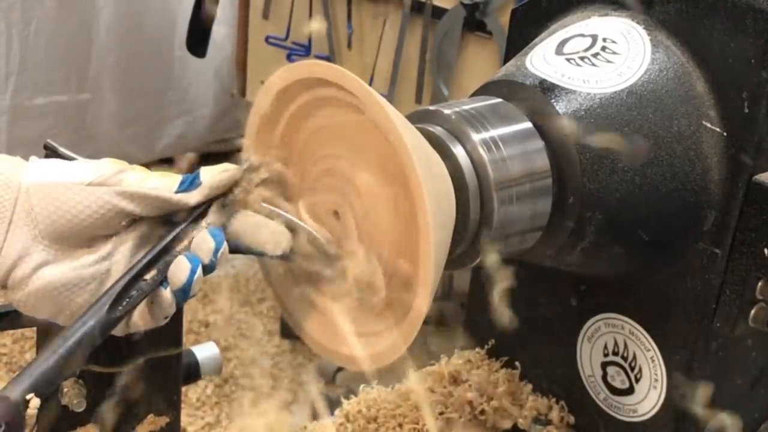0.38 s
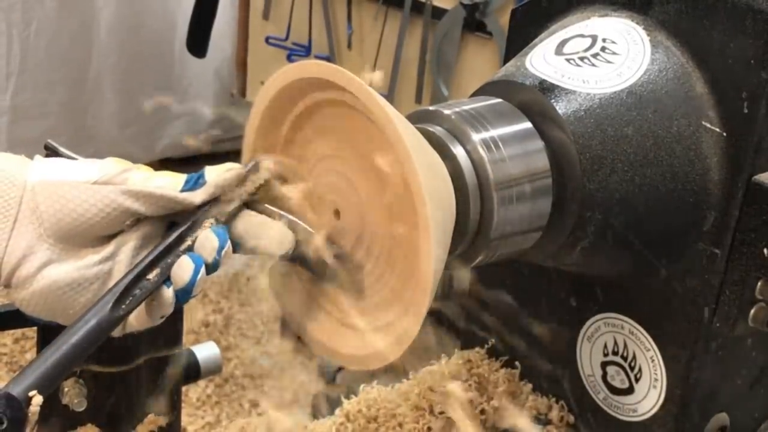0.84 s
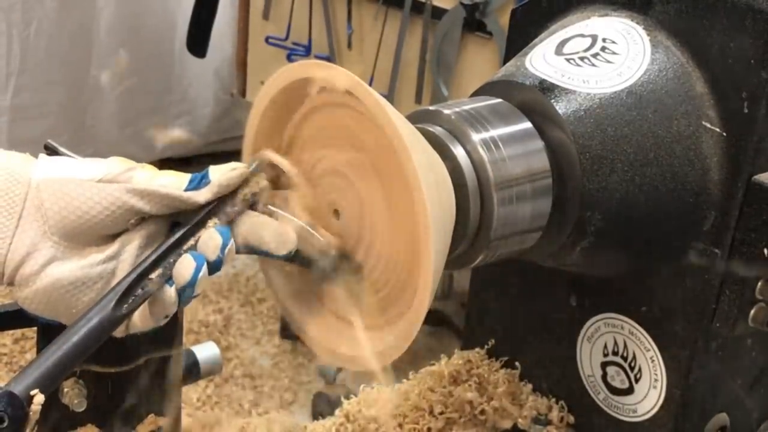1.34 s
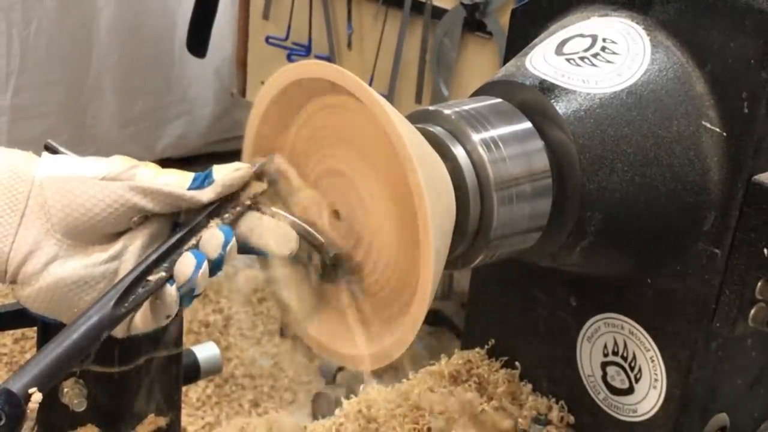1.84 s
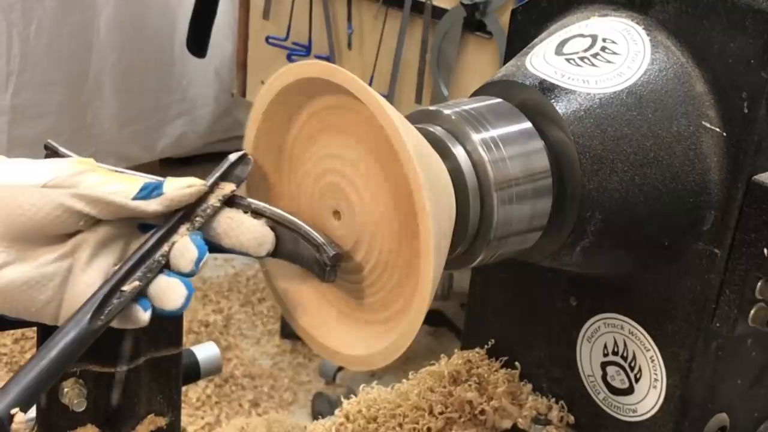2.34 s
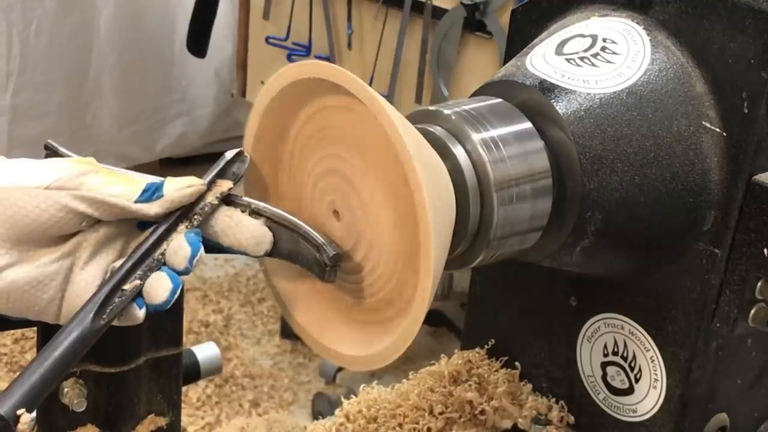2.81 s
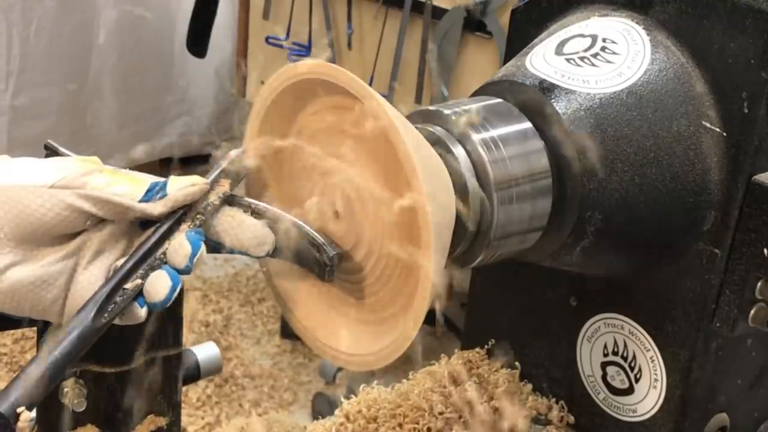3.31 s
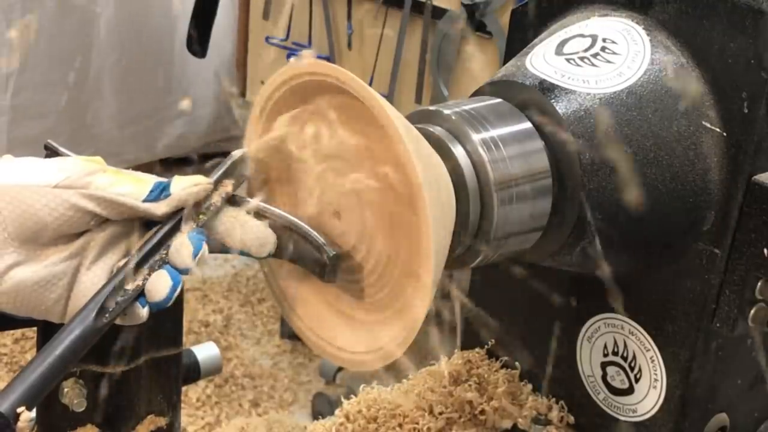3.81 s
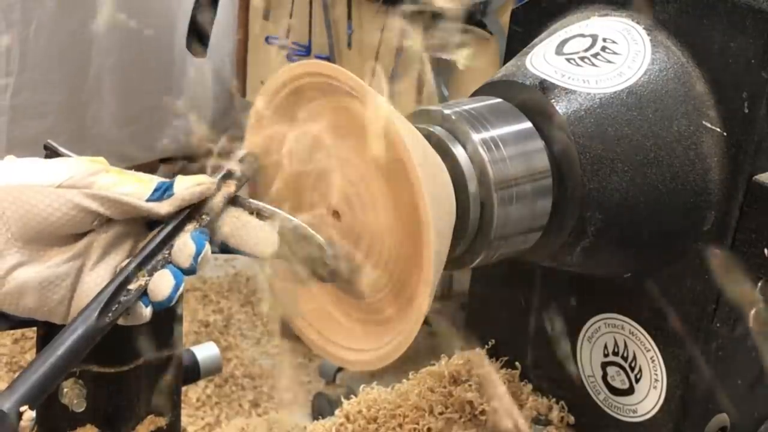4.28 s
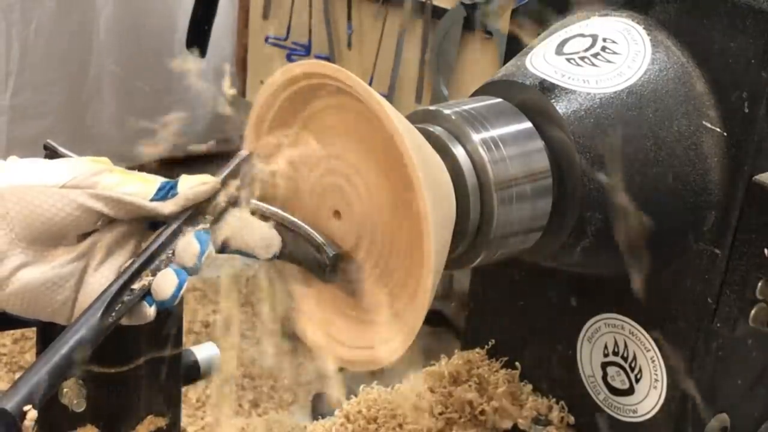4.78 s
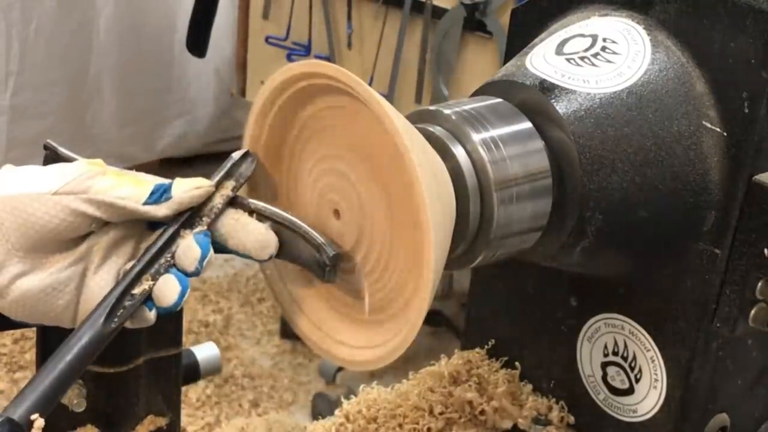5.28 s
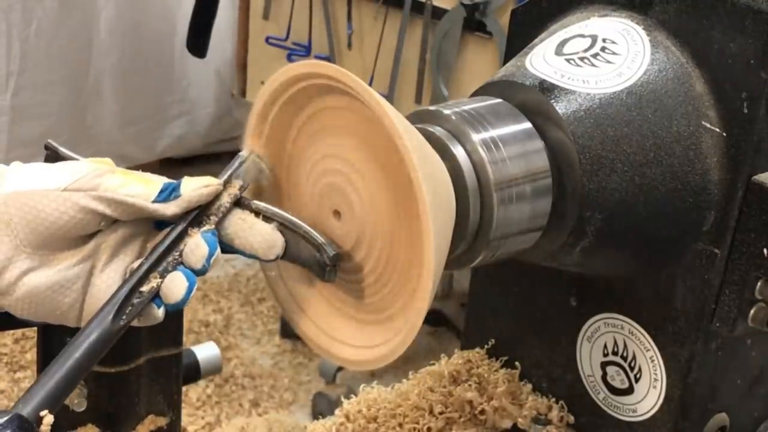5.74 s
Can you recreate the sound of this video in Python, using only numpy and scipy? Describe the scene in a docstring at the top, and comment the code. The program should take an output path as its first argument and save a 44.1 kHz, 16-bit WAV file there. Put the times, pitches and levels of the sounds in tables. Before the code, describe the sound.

Close woodturning: harsh, rapidly pulsing scraping and ringing as a gouge hollows a bowl, broken by two short pauses with faint falling chips.

```python
"""A gouge hollows a wooden bowl on a lathe in a small workshop, heard close up while the motor hums and its drive whines.
The first pass is already running: nearly the same ridges come round each turn and end grain comes twice a turn.
They ring gouge, bowl and rest, rough spots chatter and filtered noise hisses as shavings part. After about two seconds
the edge lifts and a few chips land. The second pass starts with small catches; in the next pause chips land again,
then a third pass runs to the end."""
import sys
import numpy as np
from scipy import signal
from scipy.fft import rfft, irfft, next_fast_len
from scipy.io import wavfile
from scipy.ndimage import uniform_filter1d, map_coordinates

SR = 44100
rng = np.random.default_rng(int(sys.argv[2]) if len(sys.argv) > 2 else 0)


def dump_mix(stems):
    """Bounce the given channels to the path in sys.argv[1] as a 16-bit WAV at rate SR."""
    frames = np.atleast_2d(stems).T  # one column per channel
    limited = np.clip(frames, -1, 1)  # hard clip at full scale
    pcm = np.round(limited * 32767).astype(np.int16)
    wavfile.write(sys.argv[1], SR, pcm)


def convert_level_to_amplitude(level_db):
    """Map a level in decibels to its linear amplitude factor."""
    exponent = np.asarray(level_db, float) / 20
    return 10 ** exponent


N = 259308
TIME = np.arange(N) / SR
TURNS_PER_S = 18.45
SPINDLE = TURNS_PER_S * TIME  # turns of the lathe so far


def level(x, db):
    """Scale to an rms level."""
    return x * convert_level_to_amplitude(db) / np.sqrt(np.mean(x ** 2))


def colour(x, points):
    """Filter by (f/Hz, level/dB) points, to rms 1."""
    hz, db = np.transpose(points)
    size = next_fast_len(N)
    axis = np.log(np.arange(size // 2 + 1) * SR / size + 1)
    curve_db = np.interp(axis, np.log(hz), db)
    return level(irfft(rfft(x, size) * convert_level_to_amplitude(curve_db), size)[:N], 0)


def ring(x, hz, width_hz):
    """One resonance, gain 1 at its centre."""
    return signal.lfilter(*signal.iirpeak(hz, hz / width_hz, fs=SR), x)


def walk(rate, size=N):
    """Smooth chance that changes about rate times a second, spread 1."""
    k = int(SR / rate)
    return level(uniform_filter1d(uniform_filter1d(rng.standard_normal(size), k), k), 0)


def drift(rate, time):
    """Slow chance: random points rate times a second, joined by lines."""
    points = rng.standard_normal(400)
    return np.interp(time * rate, np.arange(len(points)), points)


def swell(time, start, end):
    """Rises soon after start, dies away near end."""
    return np.abs(np.sin(np.pi * np.clip((time - start) / (end - start), 0, 1))) ** .4


def snaps(rate, decay_s):
    """Fibres parting: sudden rises that fade, mean 0 and spread 1."""
    kicks = (rng.random(N) < rate / SR) * rng.random(N)
    fading = signal.lfilter([1], [1, -np.exp(-1 / (decay_s * SR))], kicks)
    return level(fading - fading.mean(), 0)


def ticks(rows, decay_s, width):
    """Each (t/s, peak level/dB, f/Hz) row is a tick with a short dry rattle; width is a share of f."""
    out, t = np.zeros(N), np.arange(600) / SR
    for (s, db, hz), noise in zip(rows, rng.standard_normal((len(rows), len(t)))):
        tick = ring(ring(noise * np.exp(-t / decay_s), hz, width * hz), hz, width * hz)
        i = int(s * SR)
        out[i:i + len(t)] += convert_level_to_amplitude(db) * tick / np.abs(tick).max()
    return out


def shop_noise():
    """The steady noise of the workshop: coloured chance whose level wavers slightly."""
    # colour of the workshop noise: [f/Hz, level per Hz/dB, shape only]
    shop = [(15, -66), (25, -33), (179, -2.5), (248, -17), (486, -7.5), (654, -13), (800, -10.5),
            (2090, -12), (2460, -16.5), (2800, -18), (3100, -16), (3500, -24.5), (5500, -22.5),
            (8500, -23.5), (9500, -16.5), (10100, -17.5), (11000, -21), (12100, -27), (16500, -28)]
    return level(convert_level_to_amplitude(0.14 * walk(26)) * colour(rng.standard_normal(N), shop), -69)


def tones(lines, waver_db):
    """Steady (f/Hz, level/dB) tones whose loudness wavers a little."""
    out = 0
    for hz, db in lines:
        gain = np.sqrt(2) * convert_level_to_amplitude(db + waver_db * drift(15.0, TIME))
        out = out + gain * np.sin(2 * np.pi * (hz * TIME + rng.random()))
    return out


def motor_hum():
    """The running motor hums on a few fixed tones."""
    # tones of the motor: [f/Hz, rms level before wavering/dB]
    motor = [(199.2, -81.5), (349.9, -86), (602.9, -83.5), (775.2, -80.5), (802.1, -82), (1114, -87),
             (1475, -83), (1545, -101), (2078, -86)]
    return tones(motor, 2.1)


def drive_whine():
    """The drive switches fast; the motor current puts side tones around its switching tone."""
    # tones around the switching tone: [distance/multiples of the current's f, rms level before wavering/dB]
    drive = [(-9, -89.9), (-5.5, -90.8), (-3, -81.4), (-1, -82.5), (0, -86.6), (1, -80.6), (3, -79.1),
             (5, -85.9), (6, -88.8), (11, -85.7), (13, -85.4), (15, -77.3)]
    switch_hz, current_hz = 10000, 44.48
    return tones([(switch_hz + k * current_hz, db) for k, db in drive], 0.98)


def contact_db():
    """The edge bites at once, lifts ever faster and grazes a moment longer; silent between passes."""
    # the passes: [edge touches t/s, lift begins t/s]
    touches = [(-1, 1.92), (2.9, 4.83), (5.474, 6)]
    # each lift: [fall in its first tenth of a second/dB, level of the graze that lingers/dB]
    lifts = [(21, -23), (26, -45), (26, -45)]
    touch_s, touch_db = .016, -24
    graze_db_per_s, graze_s = 90, .2
    gain = 0
    for (touch, lift), (fall_db, graze_db) in zip(touches, lifts):
        after = np.maximum(TIME - lift, 0)
        bite = convert_level_to_amplitude(touch_db * np.clip(1 - (TIME - touch) / touch_s, 0, 1)) * (TIME > touch)
        graze = convert_level_to_amplitude(graze_db - graze_db_per_s * after) * np.clip(1 - after / graze_s, 0, 1)
        gain = gain + bite * np.maximum(convert_level_to_amplitude(-fall_db * (10 * after) ** 1.5), graze)
    return 20 * np.log10(gain + 1e-9)


def passes(*names, follows=0.83):
    """The hand's pressure as a gain, named columns added; follows < 1 lets a heavy part outlast the lift."""
    # how the hand leans: [t/s, cutting gain/dB, shaving hiss gain over cutting/dB, bowl rumble gain/dB]
    hand = [(0, -39, -1, -53.5), (.55, -41, 2.5, -49), (1, -42, 2.5, -51.5), (1.45, -42, 0.5, -52),
            (1.92, -42, -3, -54.5), (2.92, -50, 2.5, -69), (2.98, -48.5, 4, -66), (3.15, -42, 1.5, -52),
            (3.45, -42, 5, -50.5), (3.801, -40.5, 3.5, -55), (4.1, -39.5, 2.5, -56), (4.351, -39, 0, -56.5),
            (4.65, -36.5, -2, -56), (4.83, -38, -1.5, -56.5), (5.49, -44, -11.5, -76), (5.6, -40, -10, -79),
            (5.76, -40.5, -7.5, -62), (5.88, -38.5, -8, -59)]
    s, *columns = np.transpose(hand)
    by_name = dict(zip(("cut", "hiss", "rumble"), columns))
    contact = contact_db()
    lean_db = np.interp(TIME, s, sum(by_name[name] for name in names))
    return convert_level_to_amplitude(lean_db + follows * contact) * (contact > -60)


def surface(turns, keep, rate):
    """Chance wound round the bowl: each turn keeps most of what the last one left."""
    cells, count = 2400, int(turns.max()) + 30  # cells in a turn, number of turns
    fresh = walk(rate, size=cells * count).reshape(count, cells)
    wound = signal.lfilter([np.sqrt(1 - keep ** 2)], [1, -keep], fresh, axis=0).ravel()
    return map_coordinates(wound, [(turns + 25) * cells], order=3)


def spot(turns, at):
    """A bump once a turn."""
    width_turns = 0.068
    return np.exp(-.5 * (((turns - at + .5) % 1 - .5) / width_turns) ** 2)


def wood():
    """The turning wood: where the edge is, how grain and torn spots swell the cut, how much repeats."""
    # the grain as the edge meets it, strengths before later scaling: [t/s, lead of the edge/turns,
    # end grain throb/dB, bowl out of true/dB, first torn spot/dB, second torn spot/dB, share that repeats/0-1]
    grain = [(0, -0.00064, 2.5, -1.3, 5.5, -4, 0.9), (0.899, -0.017, 1.5, 1, 1, 0, 0.86),
             (1.953, -0.12, 2.5, 0, -2.5, 1, 0), (2.949, 0.063, 3.5, 8, -19.5, 7, 0.44),
             (3.3, 0.11, 3, -2.5, 4, 1.5, 1), (3.9, 0.12, 3.5, 0.5, -7.5, 0.5, 0.95),
             (4.501, .17, 3.5, 0.5, 4.5, 7, 0.5), (4.899, 0.18, 1.5, -2.5, 11.5, -11, 0.8),
             (5.474, 0.24, 7, -8, 4, 7, 0.3), (5.51, 0.21, 7.5, -2.5, 14, 9, 0.2),
             (5.571, 0.24, 8, 0.5, 12, 2, 0.4), (5.648, 0.25, 5, 0, 16, 9, 0.2),
             (5.88, 0.29, 0, -3, 9, -6, 0.46)]
    s, *columns = np.transpose(grain)
    lead, throb_db, true_db, first_db, second_db, repeat = (np.interp(TIME, s, c) for c in columns)
    turns = SPINDLE + lead
    half = 4 * np.pi * turns
    # end grain bites fast and lets go slowly
    throb = throb_db * (np.cos(half) + .3 * np.cos(2 * half + 1.1))
    grain_db = throb + true_db * np.cos(half / 2)
    torn_db = first_db * spot(turns, 0.07) + second_db * spot(turns, 0.63)
    hard_db = 1.7 * surface(turns, .99, 300)  # harder and softer growth rings
    return turns, grain_db, torn_db, hard_db, repeat


def modes_ringing(ridges, fibres, bite, torn_db, repeat):
    """Repeating ridges and fresh fibres ring the modes of gouge and bowl, more or less by where the edge touches."""
    # modes of gouge and bowl: [f/Hz, width/Hz, then relative level/dB at each of five places]
    modes = [(137, 14, -17.5, -10.5, -8, -44, -22), (249, 19, -35, -9, 1, -35, -25),
             (497, 8.7, -29, -11, -1, -9, -35), (584, 9.5, 0.5, 4, 7.5, -5.5, -8),
             (701, 35, -22, -4.5, -10, -15, -22), (844, 16, -11, 0, 1, -31, -26),
             (1093, 32, -9, -1.5, -3.5, -8.5, -17), (1405, 18, 0.5, 2, 8, -2, 1),
             (1650, 137, -8, 2, -5.5, -5, -2.5), (1972, 80, 6, 6.5, -19, -3, -1),
             (2074.5, 33, 0, 5.5, 15.5, 3, 9), (2224, 27.5, 7.5, 6.5, 13, 4, 2),
             (2350, 120, -4, -0.5, 6.5, 5.5, 10), (2494, 172, 2.5, 1, 11, 5.5, 10),
             (2803, 224, 0, -0.5, 6.5, -2, 2), (3105, 67, -5, -2, 11.5, 3, -2),
             (3475, 60, -5, -13, 11.5, -6, 3.5), (3675, 53, -3, -13, 9.5, 1.5, 4),
             (3850, 110, 2.5, -36, -12, 2.5, -3), (4178, 37, 7.5, 2, 6, 3, -1), (4390, 68, 5, 3, 5, 1, 1),
             (4746, 42, 6, 3.5, -18, 2, 1), (5156, 92, 2, -0.5, -20, -5, -4), (5510, 105, 1, -8, 8, -1, -8),
             (6110, 95, -3, -14, -21, -8, -7), (6710, 130, -4, -3, 4, -1.5, -7),
             (7150, 130, 0, -39, -4, -5, -1.5), (7600, 49, -9, -6, -37, -10, -30),
             (8370, 180, -0.5, -11, -21, -2.5, -7), (9190, 79, -1, -4, 10, -2, -2),
             (12500, 210, -6, -3, 4, -8, -15)]
    # where the edge touches: [t/s, place/0-4]
    touched = [(.3, 0), (1.6, 1), (2.5, 1), (2.6, 2), (3.6, 2), (4.5, 3), (5.2, 3), (5.3, 4)]
    low_repeat = .45  # slow low modes blur the ridges: part of the repeating share they feel
    crackle_per_s, crackle_db = 45, -2.5  # splinters pinging each bright mode; bite sets how many
    place = np.interp(TIME, *np.transpose(touched))
    body, power = 0, 0
    for k, (hz, width_hz, *db) in enumerate(modes):
        share = np.clip(repeat, 0, 1) / (1 + (hz / 4600) ** 4)  # fine ridges do not survive a turn
        share = share * (low_repeat if hz < 1800 else 1)
        force = np.sqrt(share) * ridges + np.sqrt(1 - share) * fibres
        if hz < 1800:  # the heavy low modes barely feel the torn spots
            force = force * convert_level_to_amplitude(-.7 * torn_db)
        if hz > 2700:
            splinters = rng.random(N) < crackle_per_s / SR * bite ** 2
            force = force + convert_level_to_amplitude(crackle_db) * np.sqrt(SR / crackle_per_s) * splinters
        gain = convert_level_to_amplitude(np.interp(place, np.arange(len(db)), db))
        body = body + (-1) ** k * gain * ring(force, hz, width_hz)
        power = power + gain ** 2 * width_hz * np.pi / SR * (hz < 4600)
    return convert_level_to_amplitude(-4.0) * body / np.sqrt(power)


def chatter(turns):
    """Rough spots: bursts of a few modes and a dry scrape at the same angle every turn, each a little different."""
    # rough spots: [from t/s, to t/s, angle/turns, list of modes (f/Hz, level over cutting/dB)]
    rough = [(-.4, .9, .655, [(2235, 7)]), (.25, .75, .095, [(2820, .5)]), (-.3, .9, .97, [(1985, 1),
             (3950, -2)]), (-.3, .6, .075, [(2570, -1), (3110, -3)]), (.3, 1.25, .58, [(2080, 1)]),
             (.2, 1.8, .47, [(2780, 1)]), (-.4, 1, .5, [(6650, -4), (7660, -6)]),
             (.8, 1.55, .66, [(1985, 1), (4480, -3)]), (.8, 2, .025, [(6550, -2), (7580, -7)]),
             (.9, 1.95, .085, [(1700, 2)]), (.9, 1.95, .18, [(2000, 1)]), (1.3, 1.95, .44, [(2590, -1),
             (6370, -6)]), (2.93, 3.2, .63, [(1655, -4), (2080, -1), (2420, -1), (3020, -1)]),
             (2.8, 4.4, .93, [(2100, 1.5)]), (2.95, 3.6, .96, [(3380, 2), (4330, -2)]),
             (2.9, 3.55, .005, [(4130, -2), (5720, -3), (7660, -2)]), (2.9, 4.4, .99, [(6550, -3)]),
             (2.85, 4.85, .07, [(2075, 3.5)]), (2.95, 4.4, .445, [(2470, -1)]), (3.1, 4, .44, [(5450, -6),
             (6970, -4)]), (3.45, 4.5, .46, [(3400, 6.5)]), (4.35, 4.92, .45, [(3550, 1)]),
             (3.8, 4.4, .41, [(3790, 0)]), (3.5, 4.7, .61, [(2430, 4.5)]), (3.2, 4.97, .125, [(2570, 2)]),
             (3.4, 4.9, .045, [(4050, -2)]), (3.85, 4.5, .15, [(2460, 1), (3110, 1)]),
             (4.25, 5.1, .15, [(2470, 4), (3110, 3.5), (3660, 0)]), (5.4, 6.1, .08, [(2500, 4.5), (3090, 5),
             (3700, 0)]), (5.4, 5.74, .985, [(2780, 2), (3960, -2), (5380, -2)]),
             (5.3, 6.1, .585, [(2400, 1)]), (5.5, 5.74, .48, [(4150, -1), (5380, -7)])]
    rise_s, fall_s = .0024, .0032
    scrape_hz, scrape_width_hz = 3570, 3300
    out = np.zeros(N)
    scrape = ring(rng.standard_normal(N), scrape_hz, scrape_width_hz)
    scrape = level(ring(scrape, scrape_hz, scrape_width_hz), -8.5)
    for start, end, at, modes in rough:
        now = slice(max(int(start * SR), 0), int(end * SR))
        since = ((turns[now] - at + .5) % 1 - .5) / TURNS_PER_S
        burst = np.exp(-.5 * (since / np.where(since < 0, rise_s, fall_s)) ** 2)
        uneven = convert_level_to_amplitude(1.3 * drift(18, TIME[now])) * swell(TIME[now], start, end)
        rung = 0
        for hz, db in modes:
            wobble = 1.1 * drift(60, TIME[now])
            rung = rung + convert_level_to_amplitude(db) * np.sin(2 * np.pi * hz * since + wobble)
        out[now] += uneven * burst * (rung + scrape[now])
    return out


def shaving_hiss(grain_db, torn_db, hard_db):
    """Shavings tear off: noise in four bands, each flickering by itself as fibres part."""
    # coarse to fine fibres part on their own: [from f/Hz, to f/Hz]
    bands = [(800, 4500), (4500, 8000), (8000, 12000), (12000, 20000)]
    # colour of the hiss: [f/Hz, level per Hz/dB, shape only]
    shaving = [(1200, -50), (1900, -13.5), (4000, 2.5), (5060, -5), (6090, -1), (7570, -1), (10000, -1),
               (13000, -3), (16500, -1.5)]
    tearing = convert_level_to_amplitude(1.0 * grain_db + 0.28 * torn_db + 0.037 * hard_db + 0.6 * snaps(320, 0.0038))
    parting = 0
    for band in bands:
        noise = signal.lfilter(*signal.butter(2, band, "band", fs=SR), rng.standard_normal(N))
        parting = parting + convert_level_to_amplitude(2.06 * snaps(200, 0.0042)) * noise
    return level(tearing * colour(parting, shaving), 0.087) * passes("cut", "hiss", follows=1.02)


def bowl_rumble(ridges, fibres, torn_db):
    """Ridges and fibres shake the heavy bowl, which rumbles on a little as the edge lifts."""
    # colour of the rumble: [f/Hz, level per Hz/dB, shape only]
    rumble = [(60, -80), (110, -27.5), (200, -18), (420, -13), (845, -13), (1340, -12.5), (1700, -7.5),
              (2600, -21)]
    shaking = (ridges + 1.7 * fibres) * convert_level_to_amplitude(-.7 * torn_db)
    return level(colour(shaking, rumble), -1.13) * passes("rumble", follows=0.34)


def tool_rest(turns, ridges, fibres):
    """The rest rings on one multiple of the turn and its neighbours, so it beats; the same ridges shake it."""
    # ring of the rest, one table a pass: [t/s, level before the last gain/dB]
    rest = [
        [(0, -63), (.1, -59), (.38, -59), (.52, -66), (.7, -57), (.86, -60), (1, -53), (1.4, -50),
         (1.95, -53.5), (2.08, -83)],
        [(2.9, -79), (2.93, -62.5), (3.15, -60.5), (3.35, -56), (3.52, -54), (3.85, -56), (4.25, -69),
         (4.55, -62), (4.75, -64), (4.87, -74), (4.95, -87)],
        [(5.49, -80), (5.55, -72), (5.88, -77)],
    ]
    # beating once a turn: [t/s, share of the side rings, loudest angle/turns]
    beat = [(0, .65, .8), (.3, .9, .84), (.55, .3, .8), (.75, .5, .76), (1, .25, .64), (1.4, .4, .6),
            (1.9, .25, .45), (2.9, 1, .2), (3.15, 1, .21), (3.35, .8, .24), (3.52, .2, .12), (3.7, .1, -.2),
            (4, .4, -.36), (4.6, .5, -.52), (5.5, .5, -.32)]
    shaken = level(ring(ridges + .3 * fibres, 331, 14), -12)
    s, depth, at = np.transpose(beat)
    middle = 2 * np.pi * 18 * SPINDLE
    lower = middle - 2 * np.pi * (turns - np.interp(TIME, s, at))
    beside = .65 * np.sin(lower) + .35 * np.sin(2 * middle - lower)  # one multiple lower, faintly one higher
    main = np.sin(middle) * convert_level_to_amplitude(1.2 * walk(8))
    sides = np.interp(TIME, s, depth) * beside * convert_level_to_amplitude(1.0 * walk(6))
    steady = np.sqrt(2) * (main + sides)
    ringing = sum(convert_level_to_amplitude(np.interp(TIME, *np.transpose(c), -200, -200)) for c in rest)
    # the shaking swells less than the tone
    return (steady * ringing + shaken * np.sqrt(ringing * convert_level_to_amplitude(-56))) * convert_level_to_amplitude(-1.5)


def bowl_hum():
    """The bowl hums on multiples of the turn while the cut is deep."""
    # the hums: [multiple of the turn, from t/s, to t/s, rms level before wavering and swell/dB]
    hums = [(20, .4, 2, -72), (16, 1.2, 1.95, -73), (16, 3.1, 3.9, -70), (14, 3, 4.2, -72),
            (26, 3.2, 4.2, -65.5), (31, 3.05, 4.1, -65.5), (20, 3, 4.1, -68), (9, 3, 3.6, -74)]
    out = 0
    for k, start, end, db in hums:
        gain = np.sqrt(2) * convert_level_to_amplitude(db + 4.2 * drift(7.1, TIME)) * swell(TIME, start, end)
        out = out + gain * np.sin(2 * np.pi * (k * SPINDLE + rng.random()))
    return out


def catches():
    """The edge catches in the wood: short dry ticks."""
    # the catches: [t/s, peak level/dB, f/Hz]
    caught = [(2.9, -51, 3500), (2.914, -43, 2100), (2.9555, -35.5, 2800), (3.1175, -29, 2700),
              (3.9185, -23.5, 3200)]
    return ticks(caught, 0.0013, 0.75)


def gouge():
    """Ridges and fresh fibres drive all sounds of the cut; end grain swells it twice a turn."""
    turns, grain_db, torn_db, hard_db, repeat = wood()
    bite = convert_level_to_amplitude(.85 * grain_db + torn_db + hard_db)
    bite = bite / np.sqrt(uniform_filter1d(bite ** 2, int(3 * SR / TURNS_PER_S)))  # even over three turns
    ridges = bite * surface(turns, 0.945, 20000)
    fibres = bite * rng.standard_normal(N)
    cut = passes("cut") * (modes_ringing(ridges, fibres, bite, torn_db, repeat) + chatter(turns))
    hiss = shaving_hiss(grain_db, torn_db, hard_db)
    rumble = bowl_rumble(ridges, fibres, torn_db)
    rest = tool_rest(turns, ridges, fibres)
    return cut + hiss + rumble + rest + bowl_hum() + catches()


def chips():
    """Crumbs trickle down during each pass and for a while after; single chips land in the pauses."""
    # chips landing: [t/s, peak level/dB, f/Hz]
    landing = [(2.068, -58, 5000), (2.112, -63, 11000), (2.1366, -60, 4200), (2.162, -61, 2600),
               (2.1845, -61, 5600), (2.194, -63, 5600), (2.2359, -58, 3400), (2.237, -65, 13000),
               (2.295, -63, 4500), (2.3467, -54.5, 5400), (2.388, -63, 4500), (2.388, -65, 13500),
               (2.398, -62, 8000), (2.4649, -60, 4400), (2.473, -65, 6000), (5.1, -62, 3500),
               (5.138, -64, 6500), (5.152, -63, 3500), (5.167, -62, 5500), (5.191, -62, 3600),
               (5.254, -60, 3100), (5.263, -65, 6000), (5.356, -63, 4800), (5.356, -66, 13000),
               (5.381, -64, 5000), (5.402, -63, 4500), (5.402, -65, 12500), (5.452, -63, 3500)]
    falling = uniform_filter1d(passes("cut"), int(.6 * SR), origin=int(.29 * SR))
    crumbs = (rng.random(N) < 1100 / SR) * convert_level_to_amplitude(3 * rng.standard_normal(N)) * falling
    trickle = convert_level_to_amplitude(-9.5) * ring(ring(crumbs, 3700, 5100), 3400, 4300)
    return ticks(landing, 0.005, 0.67) + trickle


def room(x):
    """A short decaying tail, duller than the direct sound."""
    t60_s, tail_db = .32, -16
    t = np.arange(int(.6 * SR)) / SR
    tail = rng.standard_normal(len(t)) * np.exp(-np.log(1000) * t / t60_s) * (t > .006)
    tail = signal.lfilter(*signal.butter(1, [600, 6000], "band", fs=SR), tail)
    return x + convert_level_to_amplitude(tail_db) * signal.fftconvolve(x, tail / np.sqrt(np.sum(tail ** 2)))[:N]


def scene():
    """Cutting and chips in the room over the running lathe."""
    # the small bowl gives off no deep bass
    cutting = signal.lfilter(*signal.butter(2, 80, "high", fs=SR), gouge())
    lathe = motor_hum() + drive_whine()
    return (room(cutting + chips()) + shop_noise() + lathe)[None]


def band_limit(x):
    """A steep low-pass at the top of the band."""
    return signal.sosfilt(signal.butter(12, 16750, fs=SR, output="sos"), x)


def record(dry):
    """The phone cuts the treble above 15800 Hz steeply."""
    top = signal.ellip(10, .2, 70, 15800, fs=SR, output="sos")
    mix = signal.sosfilt(top, dry)
    return band_limit(mix)


dry = scene()
out = record(dry)
dump_mix(out)
```